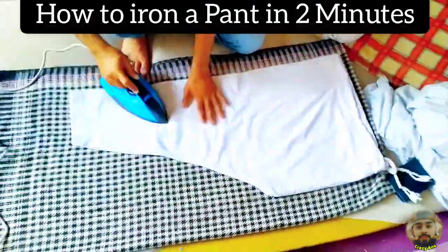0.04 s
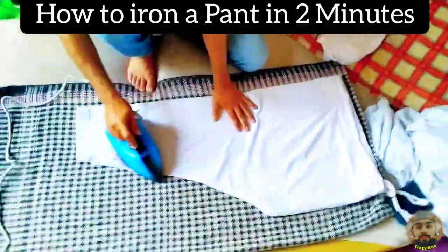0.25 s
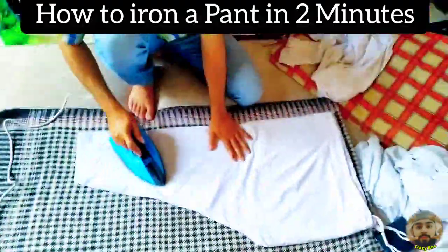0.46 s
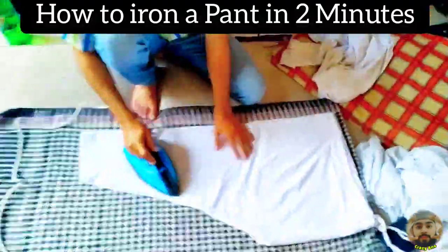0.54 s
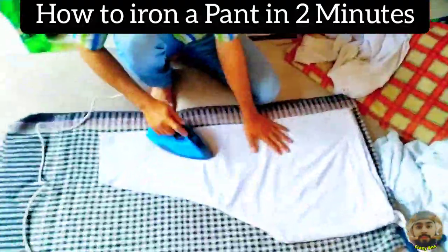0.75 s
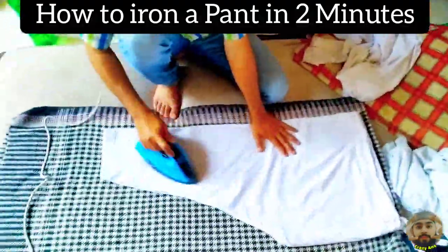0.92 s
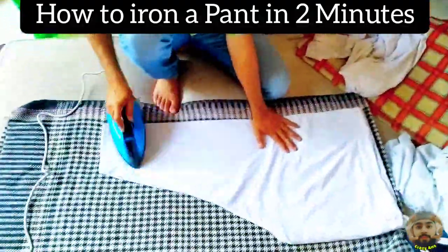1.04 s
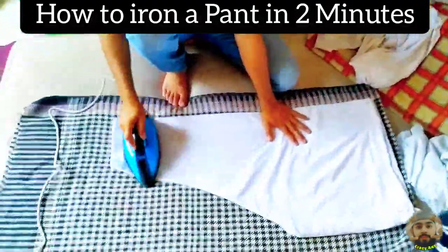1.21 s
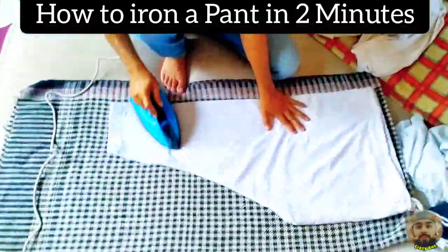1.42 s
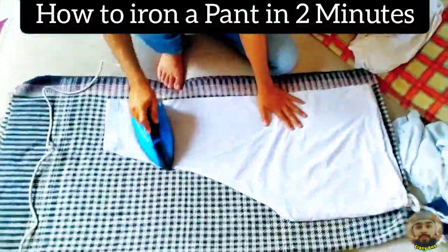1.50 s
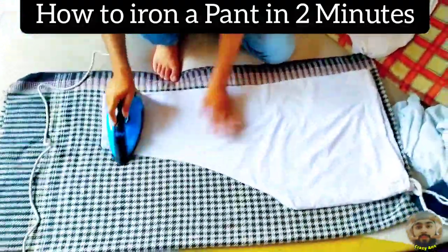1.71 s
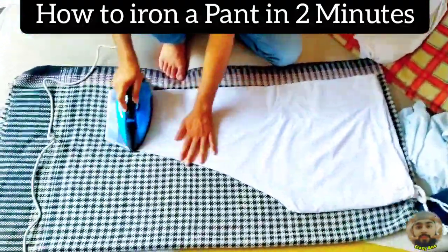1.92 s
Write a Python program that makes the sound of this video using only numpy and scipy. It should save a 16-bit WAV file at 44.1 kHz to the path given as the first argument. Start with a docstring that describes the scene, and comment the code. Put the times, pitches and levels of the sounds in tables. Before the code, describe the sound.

A microphone is bumped on the right side: a light touch at about 0.1 seconds, then a quick cluster of loud, dull, slightly overloaded knocks from 0.2 to 0.3 seconds, with faint rubbing. A low rumble fades by about 0.8 seconds. Cloth shifts very softly twice around 1.5 and 1.7 seconds. A steady fan-like hum, soft air noise and hiss fill the quiet room throughout.

```python
"""A steady fan-like hum and soft air noise fill a quiet room, under the hiss of two microphones.
Almost at once something brushes the right microphone: a light touch, then a quick cluster of dull
knocks, shoves of pressure that overload it, with a trace of rubbing and a low rumble that dies down.
Later, out in the room, cloth shifts softly twice, heard equally on both sides."""
import sys
import numpy as np
from scipy import signal
from scipy.fft import rfft, irfft
from scipy.io import wavfile

SR = 44100
rng = np.random.default_rng(int(sys.argv[2]) if len(sys.argv) > 2 else 0)


def dump_mix(stems):
    """Bounce the given channels to the path in sys.argv[1] as a 16-bit WAV at rate SR."""
    frames = np.atleast_2d(stems).T  # one column per channel
    limited = np.clip(frames, -1, 1)  # hard clip at full scale
    pcm = np.round(limited * 32767).astype(np.int16)
    wavfile.write(sys.argv[1], SR, pcm)


N = 85995


def amp(db):
    """Decibels to gain."""
    return 10 ** (np.asarray(db) / 20)


def add(mix, start_s, sound):
    """Mixes a sound in at a time."""
    part = mix[max(round(start_s * SR), 0):][:len(sound)]
    part += sound[:len(part)]


def noise(spectrum):
    """Steady noise shaped by (frequency [Hz], level [dB per Hz]) points."""
    hz = np.fft.rfftfreq(N, 1 / SR)
    point_hz, point_db = np.transpose(spectrum)
    gain = amp(np.interp(np.log(hz + 1), np.log(point_hz + 1), point_db))
    return irfft(rfft(rng.standard_normal(N)) * gain, N) * np.sqrt(SR / 2)


def drift(seconds):
    """Slow random motion of rms 1."""
    hz = np.fft.rfftfreq(N, 1 / SR)
    smoothing = np.exp(-(hz * seconds) ** 2) * (hz > 0)
    motion = irfft(rfft(rng.standard_normal(N)) * smoothing, N)
    return motion / (motion.std() + 1e-20)


def friction(strokes, colour):
    """Friction noise that swells and fades once per stroke."""
    envelope = np.zeros(N)
    for start_s, length_s, db in strokes:
        add(envelope, start_s, amp(db) * np.sqrt(np.hanning(round(length_s * SR))))
    return envelope * noise(colour)


def lowpass(stereo, hz):
    """Steep band limit."""
    taps = signal.firwin(511, hz, window=("kaiser", 9), fs=SR)
    return signal.oaconvolve(stereo, taps[None], "same", axes=1)


# Self-noise of each microphone (frequency [Hz], level [dB per Hz])
LEFT_SELF_NOISE = [(20, -75), (60, -98), (150, -85.5), (300, -97.5), (700, -92), (1300, -88.5),
                   (2200, -87.5), (2900, -92), (4400, -92.5), (5300, -89), (6200, -86.5), (7300, -83),
                   (7700, -86), (8000, -101)]
RIGHT_SELF_NOISE = [(20, -95), (60, -91.5), (150, -126.5), (300, -86.5), (700, -100.5), (1300, -102),
                    (2300, -95.5), (4000, -99), (6000, -102), (7500, -102), (7900, -118)]

def microphone_hiss():
    """Each microphone makes its own steady hiss, brighter on the left."""
    return np.array([noise(LEFT_SELF_NOISE), noise(RIGHT_SELF_NOISE)])


# Room tone at both microphones (frequency [Hz], level [dB per Hz])
AIR_SPECTRUM = [(20, -86), (60, -86.5), (95, -82), (130, -82), (160, -90), (230, -81), (330, -89),
                (400, -86.5), (600, -87.5), (950, -86.5), (1250, -92.5), (2000, -98.5), (4000, -102),
                (8000, -108)]

def room_air(left_lag_s=0.00021, waver_db=0.7):
    """Gently wavering air noise that reaches the left microphone a little later."""
    air = noise(AIR_SPECTRUM) * amp(waver_db * drift(seconds=0.025))
    return np.array([np.roll(air, round(left_lag_s * SR)), air])


# Hum in the room (frequency [Hz], left level [dB], right level [dB], rms wander [Hz])
HUM_TONES = [(194.2, -62.5, -60.5, 4.5), (326, -65, -69, 4.06), (494, -59, -56, 1.46), (700, -82.5, -71, 3),
             (990, -68.5, -71.5, 1)]

def room_hum(wander_s=0.058, waver_db=1.0):
    """Fan-like tones at both microphones, wandering slightly in pitch and level."""
    out = np.zeros((2, N))
    for hz, left_db, right_db, wander_hz in HUM_TONES:
        cycles = np.cumsum(hz + wander_hz * drift(wander_s)) / SR
        tone = np.sqrt(2) * np.sin(2 * np.pi * cycles)
        waver = amp(waver_db * drift(wander_s))
        out += amp([[left_db], [right_db]]) * tone * waver
    return out


# Cloth moving out in the room (time [s], length [s], level [dB])
CLOTH_STROKES = [(1.53, 0.048, -73.5), (1.635, 0.085, -79)]
# Its colour at both microphones (frequency [Hz], relative level [dB])
CLOTH_COLOUR = [(40, -18), (110, -28), (250, 8), (400, -28), (1500, -16), (8000, -39)]

def cloth_shuffles():
    """Cloth slides twice with a soft, low rustle."""
    return friction(CLOTH_STROKES, CLOTH_COLOUR)


# Handling rumble in the right microphone, before its fade (frequency [Hz], level [dB per Hz])
RUMBLE_SPECTRUM = [(5, -58), (18, -46.5), (35, -53), (60, -69), (110, -106), (300, -105)]

def handling_rumble(start_s=0.2, rise_s=0.022, decay_s=0.21, floor_db=-21.5):
    """The brushed microphone rumbles with the knocks, then settles to a faint floor."""
    age = np.arange(N) / SR - start_s
    onset = np.clip(age / rise_s, 0, 1)
    fade = np.exp(-np.maximum(age, 0) / decay_s) + amp(floor_db)
    return noise(RUMBLE_SPECTRUM) * onset * fade


# Rubbing right on the microphone (time [s], length [s], level [dB])
RUB_STROKES = [(0.232, 0.013, -82.5), (.2405, 0.006, -87), (.28, 0.08, -90.5)]
# Its colour at the point of contact (frequency [Hz], relative level [dB])
CONTACT_COLOUR = [(500, 8), (3000, -6), (6300, -0.5), (8000, -18)]

def microphone_rubs():
    """Something slides against the right microphone in brief, faint scuffs."""
    return friction(RUB_STROKES, CONTACT_COLOUR)


# Knocks directly on the right microphone
# (time [s], level before overload [dB], direction [+1 push, -1 pull], rise [s], decay [s], tick gain [dB])
MIC_KNOCKS = [ (0.1096, -32, -1, .0008, 0.0063, -42), (0.1133, -31, 1, 0.00089, 0.0032, -66),
              (0.2296, 3, 1, 0.00235, 0.0017, -25), (0.2328, 7.5, -1, 0.00338, 0.0045, -38),
              (0.2567, 4.5, 1, 0.0022, 0.0041, -30), (0.2726, -9, 1, .007, 0.0051, -67),
              (0.2897, -1.5, -1, 0.00083, 0.0052, -25.5), (0.2945, -17, 1, 0.0073, 0.017, -69.5), ]
# Colour of the contact tick (frequency [Hz], relative level [dB])
TICK_SPECTRUM = [(300, -46), (1600, -34.5), (3000, -43.5), (6000, -43), (8000, -38)]

def microphone_knocks(tick_decay_s=0.001):
    """Each knock is a one-sided shove of pressure that leaks away; sharp ones start with a tiny tick."""
    out = np.zeros(N)
    t = np.arange(SR // 8) / SR
    for start_s, db, direction, rise_s, decay_s, tick_db in MIC_KNOCKS:
        rise = np.sin(np.pi / 2 * np.minimum(t / rise_s, 1)) ** 2
        leak = np.exp(-np.maximum(t - rise_s, 0) / decay_s)
        shove = direction * rise * leak
        tick = noise(TICK_SPECTRUM)[:len(t)] * np.exp(-t / tick_decay_s)
        add(out, start_s, amp(db) * shove + amp(tick_db) * tick)
    return out


def scene():
    """The room and the cloth in both microphones, the handling in the right one only."""
    out = room_air() + microphone_hiss() + room_hum() + cloth_shuffles()
    out[1] += microphone_knocks() + microphone_rubs() + handling_rumble()
    return out


def record(dry, ceiling=0.94, knee=12):
    """Narrow-band microphones whose signal flattens on overload; then a final band limit."""
    narrow = lowpass(dry, hz=8050)
    flattened = narrow / (1 + abs(narrow / ceiling) ** knee) ** (1 / knee)
    return lowpass(flattened, hz=15200)


dry = scene()
out = record(dry)
dump_mix(out)
```